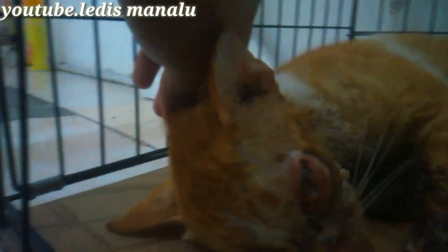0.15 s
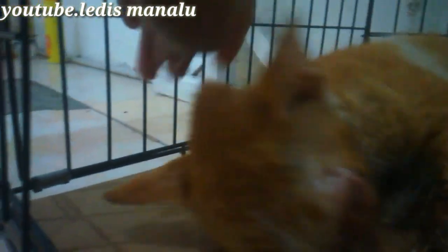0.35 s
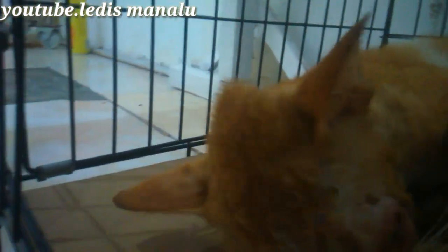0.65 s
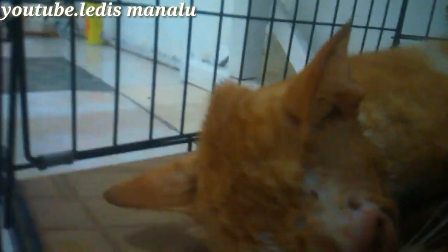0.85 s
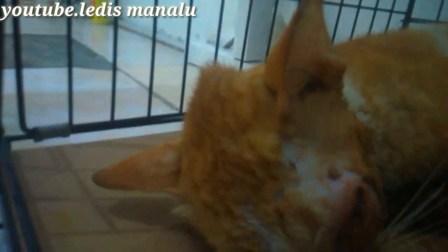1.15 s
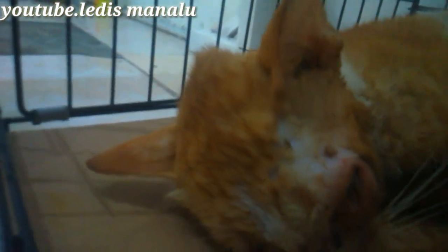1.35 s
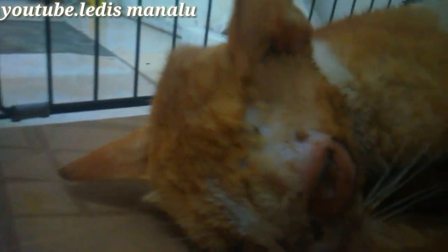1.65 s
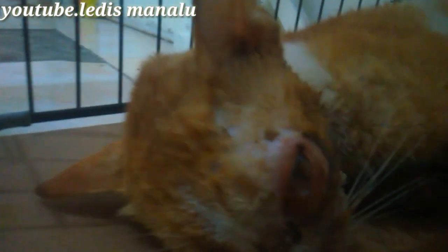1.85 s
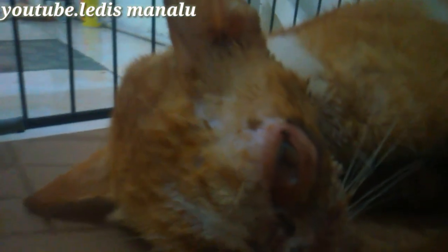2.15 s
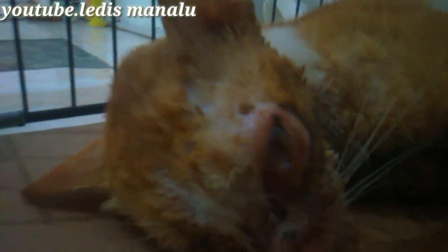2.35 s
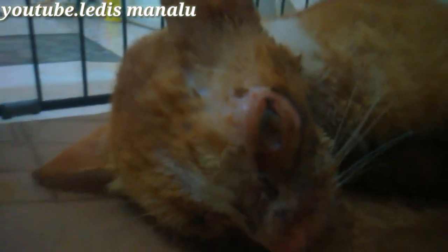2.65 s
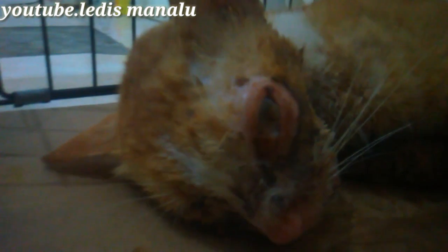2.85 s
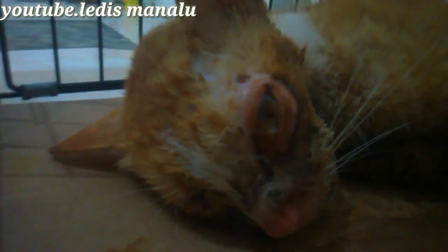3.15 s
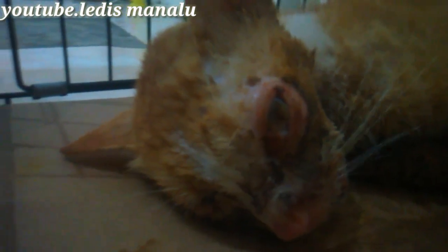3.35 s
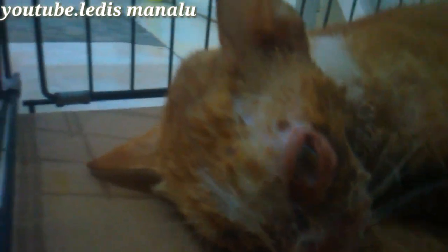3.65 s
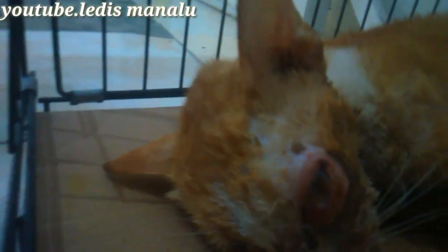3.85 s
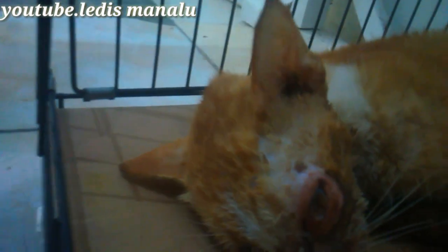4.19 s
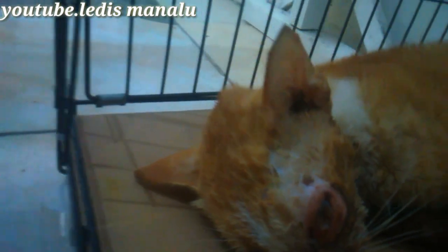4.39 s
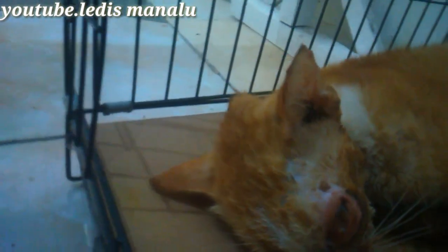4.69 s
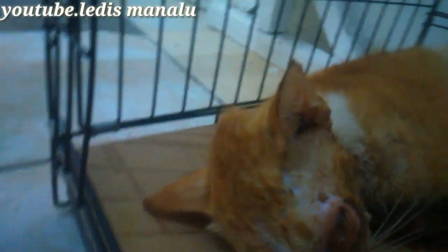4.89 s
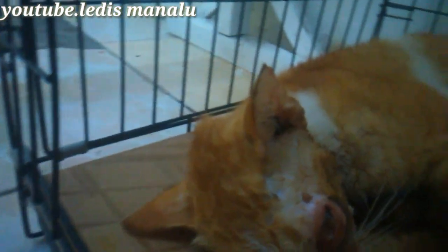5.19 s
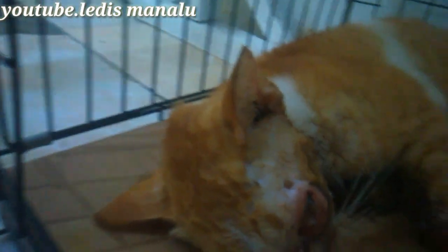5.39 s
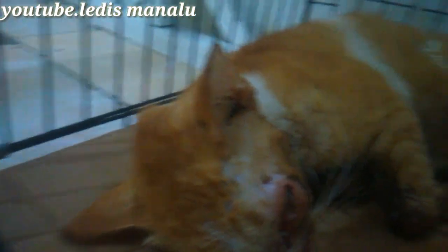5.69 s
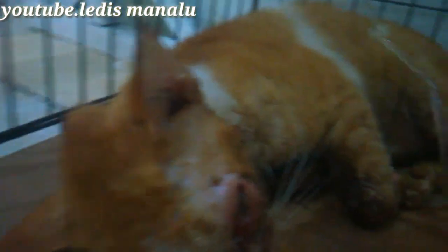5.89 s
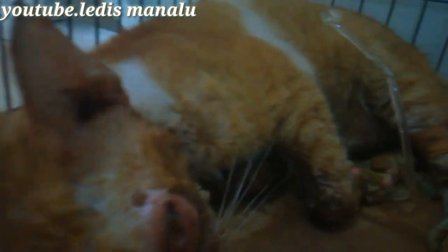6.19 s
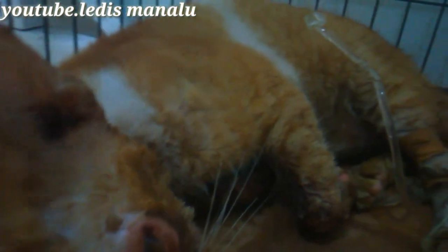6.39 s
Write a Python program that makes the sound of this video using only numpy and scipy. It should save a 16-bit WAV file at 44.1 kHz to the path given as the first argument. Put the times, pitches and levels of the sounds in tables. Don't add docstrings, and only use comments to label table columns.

```python
import sys
import numpy as np
from scipy import signal
from scipy.fft import rfft, irfft, next_fast_len
from scipy.io import wavfile
from scipy.ndimage import uniform_filter1d, map_coordinates

SR = 44100
rng = np.random.default_rng(int(sys.argv[2]) if len(sys.argv) > 2 else 0)


def elevation(decibels):
    levels = np.asarray(decibels, float)
    return 10 ** (levels / 20)


def to_wav(sig):
    pcm = np.clip(np.atleast_2d(sig), -1, 1) * 32767
    pcm = np.round(pcm).astype(np.int16)
    wavfile.write(sys.argv[1], SR, pcm.T)


N = 287973

# start_s, pulse_rate_hz
PULSE_RATE = [(0.0, 22.46), (0.2, 22.16), (0.65, 22.9), (1.17, 22.89), (1.55, 24.35), (1.85, 25.44),
              (2.25, 26.0), (2.5, 26.84), (2.95, 27.51), (3.43, 28.45), (3.82, 29.0), (4.04, 27.84),
              (4.08, 24.65), (4.43, 24.61), (4.65, 23.15), (5.1, 24.05), (6.12, 25.91), (6.53, 26.32)]
# start_s, street_flow_db, hiss_db
STREET_FLOW = [(0.0, -43, -57.5), (0.2, -44.5, -53), (0.65, -41.5, -53.5), (1.73, -37.5, -55),
               (2.07, -38.5, -58), (2.35, -35.5, -55), (2.71, -36.5, -52), (2.9, -33.5, -49),
               (3.58, -35, -52.5), (3.76, -34.5, -52.5), (3.95, -38.5, -56), (4.29, -42, -71),
               (4.53, -43, -70), (4.67, -50.5, -66), (5.22, -50, -65), (5.87, -46.5, -54.5),
               (6.24, -44.5, -50), (6.53, -47.5, -55.5)]
MEAN_FLOW_DB, MEAN_HISS_DB = -41, -57


def unit(x):
    return x / np.sqrt(np.mean(x ** 2) + 1e-20)


def along(points, hz):
    f, v = np.transpose(points)
    return np.interp(np.log(hz + 1), np.log(f + 1), v)


def curves(rows):
    s, *cols = np.transpose(rows)
    return [np.interp(np.arange(N) / SR, s, c) for c in cols]


def wobble(rate_hz):
    t = np.arange(0, N + 128, step=128)
    knots = rng.standard_normal(400)
    return np.interp(np.arange(N), t, map_coordinates(knots, [t * rate_hz / SR], mode="wrap"))


def swell(start_s, length_s):
    out = np.zeros(N)
    live = np.arange(round(start_s * SR), min(N, round((start_s + length_s) * SR)))
    out[live] = np.abs(np.sin(np.pi * (live / SR - start_s) / length_s))
    return out


def filtered(x, response):
    m = next_fast_len(N + SR // 2)
    x = np.pad(x, ((0, 0), (4096, 4096)), mode="reflect")
    return irfft(rfft(x, m) * response(np.fft.rfftfreq(m, 1 / SR)), m)[:, 4096:][:, :N]


def rush(spectrum, patchy_db, lead_s=0):
    # pitch_hz, left_right_likeness (0-1)
    alike = [(60, .997), (130, .98), (290, .7), (640, .4), (1400, .22), (3100, .15), (6800, 0)]
    z = signal.stft(rng.standard_normal((2, N + 512)), nperseg=512)[2]
    field = uniform_filter1d(rng.standard_normal(z.shape[1:]), size=6, axis=0)
    field = uniform_filter1d(field, size=12, axis=1)
    pair = signal.istft(z * elevation(patchy_db * unit(field)), nperseg=512)[1][:, :N]

    def mid_side(hz):
        turn = np.arccos(np.clip(along(alike, hz), -1, .999)) / 2
        return elevation(along(spectrum, hz)) * [np.cos(turn), np.sin(turn)]

    mid, side = filtered(pair, mid_side)
    early = np.pad(mid + side, (0, 64), mode="reflect")[round(lead_s * SR):][:N]
    return np.array([early, mid - side]) / np.std(mid)


def tone(phase, db, wander, spread):
    drift = wander * wobble(6) + spread * np.array([[1], [-1]]) * (1 + 0.17 * wobble(3.09))
    return np.sqrt(2) * elevation(db) * np.sin(phase + drift + rng.uniform(0, 2 * np.pi))


def throbs(*overtones_hz):
    # start_s, length_s, peak_db, resonance_hz
    throb_events = [(0.209, 0.31, -30, 111.5), (0.585, 0.34, -22.5, 116), (0.962, 0.18, -24.5, 112),
                    (1.203, .2, -23, 123), (1.411, 0.13, -27.5, 118), (1.635, 0.08, -27, 102),
                    (1.7, 0.33, -19, 132.3), (1.708, 0.37, -28, 150), (2.087, 0.26, -21.5, 120),
                    (2.15, 1, -27.5, 155), (2.494, 0.13, -19.5, 114), (2.59, 0.52, -19, 141),
                    (3.04, 0.18, -19.5, 127), (3.233, 0.46, -16, 112.5), (3.305, 0.23, -25, 172.6),
                    (3.574, .25, -27, 166), (3.779, 0.29, -23, 109), (4.178, 0.17, -23.5, 108),
                    (4.37, 0.12, -22.5, 107), (4.506, 0.12, -22, 116.6), (4.623, 0.098, -30, 107.6),
                    (4.8, 0.059, -27, 106.6), (5.09, 0.13, -30.5, 97), (5.258, 0.84, -30, 128),
                    (5.373, .12, -28.5, 98), (5.551, 0.081, -29, 100), (5.757, 0.31, -33, 155),
                    (5.915, 0.14, -27, 104), (6.195, 0.77, -28, 105.2), (6.343, .3, -30, 133.9)]
    half_width_hz, flat = 13.2, 0.31
    at = np.arange(0, N + 128, step=128)
    s, length, db, centre_hz = np.transpose(throb_events)[:, :, None]
    arch = np.abs(np.sin(np.pi * np.clip((at / SR - s) / length, 0, 1)))
    power = (elevation(db) * arch ** flat) ** 2
    shares = []
    for hz in overtones_hz:
        off = (hz[np.minimum(at, N - 1)] - centre_hz) / half_width_hz
        shares.append(1 / (1 + off ** 2) ** 2)
    return [np.interp(np.arange(N), at, np.sqrt(np.sum(power * share, axis=0))) for share in (*shares, 1)]


def engine():
    # start_s, length_s, peak_db
    low_swells = [(.17, 0.26, -48), (0.457, 0.23, -37), (.98, 0.57, -46), (1.45, 0.84, -32),
                  (2.506, 0.19, -41), (2.9, 0.22, -37), (3.3, 0.8, -50), (4.15, 0.45, -30.5),
                  (5.029, .8, -29.5), (5.51, 0.83, -26), (6.22, 0.39, -37)]
    # multiple, level_db (below the mean of the strong ones)
    weak = [(3, -18), (7, -23), (8, -25)]
    between_db, flutter_db = -44, 2
    hz, = curves(PULSE_RATE)
    phase = 2 * np.pi * np.cumsum(hz) / SR
    low = np.sqrt(sum((elevation(db) * swell(s, length) ** 0.37) ** 2 for s, length, db in low_swells))
    out = (low + elevation(-49)) * tone(2 * phase, 1.3 * wobble(9.2), wander=0.11, spread=0.05)
    *sizes, whole = throbs(*(k * hz for k in range(4, 7)))
    for k, size in zip(range(4, 7), sizes):
        size = size * elevation(flutter_db * wobble(14)) + elevation(between_db + 3.7 * wobble(13))
        out += size * tone(k * phase, 0, wander=0.065, spread=0.051)
    slow_db = uniform_filter1d(10 * np.log10(whole ** 2 + elevation(between_db) ** 2), size=SR // 3) - 3
    for k, db in weak:
        out += tone(round(k) * phase, slow_db + db + 5 * wobble(8), wander=1.83, spread=0.2)
    return out


def room():
    # pitch_hz, density_db (per Hz)
    boom_modes = [(18, -43), (30, -26), (108, -4), (137, -3.5), (200, -17.5), (260, -36), (440, -120)]
    drone_modes = [(110, -15), (185, -1.5), (221, -3.5), (280, -1), (340, -16), (440, -36), (750, -120)]
    # start_s, level_db
    idling = [
        (0, -44),
        (1.3, -34.5),
        (2.3, -31.5),
        (3.0, -39),
        (3.25, -32.5),
        (4.12, -37.5),
        (5.15, -46),
        (5.42, -41),
        (6.53, -44),
    ]
    flow_db = curves(STREET_FLOW)[0] - MEAN_FLOW_DB
    boom = elevation(-11.5) * throbs()[0] + elevation(-35 + 0.52 * flow_db + 2.5 * wobble(9))
    drone = elevation(1.5 + curves(idling)[0] + 0.8 * wobble(6.6))
    return boom * rush(boom_modes, patchy_db=2.1) + drone * rush(drone_modes, patchy_db=-1.0)


def air():
    # pitch_hz, density_db (per Hz)
    street_spectrum = [(190, -14), (330, -2.5), (355, -4.5), (526, -3.5), (595, -4.5), (800, -7.5),
                       (1040, -27.5), (1760, -120)]
    tyre_spectrum = [(460, -61), (780, 2.5), (808, -4), (858, 0.5), (922, 1.5), (1240, -8), (1500, -16.5),
                     (2100, -120)]
    traffic_spectrum = [(820, -25), (1400, 0), (1920, -3), (2600, -8), (3670, -14.5), (5000, -18),
                        (6500, -28.5), (11000, -120)]
    hiss_spectrum = [(2400, -10.5), (4000, -8), (6400, -4.5), (10500, -1), (11600, -5), (12100, -15),
                     (12500, -30), (15500, -21)]
    flow_db, hiss_db = curves(STREET_FLOW)
    more_flow_db, more_hiss_db = flow_db - MEAN_FLOW_DB, hiss_db - MEAN_HISS_DB
    tyres_db = -46 + 0.56 * more_flow_db
    traffic_db = -51.5 + 0.37 * more_flow_db + 0.28 * more_hiss_db
    street = elevation(flow_db + 0.5 + 2.34 * wobble(8)) * rush(street_spectrum, patchy_db=1.38)
    tyres = elevation(tyres_db + 1.4 * wobble(7.7)) * rush(tyre_spectrum, patchy_db=1.5, lead_s=0.00021)
    traffic = elevation(traffic_db + 0.86 * wobble(9)) * rush(traffic_spectrum, patchy_db=1.22, lead_s=0.00034)
    hiss = elevation(hiss_db + 0.14 + 0.9 * wobble(13)) * rush(hiss_spectrum, patchy_db=0.43)
    return street + tyres + traffic + hiss


def mains():
    # pitch_hz, level_db (rms)
    hum = [
        (200, -50),
        (300, -45),
        (400, -52.5),
    ]
    t = np.arange(N) / SR
    return sum(tone(2 * np.pi * hz * t, db - 6.0 + 3 * wobble(5), wander=2.46, spread=0.12) for hz, db in hum)


def cage():
    # start_s, peak_db, left_minus_right_db, ring_hz
    ticks = [
        (1.507, -26, 14, 4160),
        (1.6213, -30, 8, 4336),
        (1.696, -35, 4, 7460),
        (1.7814, -31, 4, 13500),
        (2.3017, -32, 4, 9430),
        (3.9444, -53, -3, 4180),
    ]
    # start_s, length_s, level_db
    brushes = [
        (.1, .08, -62),
        (0.422, 0.22, -56),
        (0.683, 0.041, -52),
        (.755, 0.035, -51),
        (1.2, 0.055, -53.5),
        (6.123, 0.051, -56),
    ]
    out, t = np.zeros((2, N + SR)), np.arange(SR // 20) / SR
    late = np.maximum(t - .002, 0)
    for s, db, pan_db, hz in ticks:
        crack = .5 * elevation(-60 * t / .009) * rng.standard_normal((2, len(t)))
        ring = .3 * elevation(-60 * late / .012) * np.sin(2 * np.pi * hz * late)
        out[:, round(s * SR):][:, :len(t)] += (crack + ring) * elevation(db + pan_db * np.array([[.5], [-.5]]))
    stroke = sum(elevation(db) * swell(s, length) for s, length, db in brushes)
    fur = stroke * rush([(5000, -39), (8000, -1), (11000, 0), (15000, -8)], patchy_db=3.5)
    wire_colour = lambda hz: hz ** 2 / (hz ** 2 + 1100 ** 2) / (1 + (hz / 11800) ** 6)
    return filtered(out[:, :N], wire_colour) + fur


def whine():
    # start_s, level_db
    whine_level = [
        (1.9, -53),
        (2.12, -29.5),
        (2.36, -37),
        (2.65, -38.5),
        (2.75, -31.5),
        (3.1, -33.5),
        (3.31, -25),
        (3.54, -29.5),
        (3.75, -30),
    ]
    db, = curves(whine_level)
    hz = np.minimum(28.1 * uniform_filter1d(curves(PULSE_RATE)[0], size=SR // 2), 794)
    start_s, end_s = whine_level[0][0], whine_level[-1][0]
    phase = 2 * np.pi * np.cumsum(hz) / SR
    pair = 0
    for ratio in (.986, 1.014):
        smeared = phase * ratio + 1.18 * wobble(45)
        pair = pair + tone(smeared, db - 6.5 + 4 * wobble(17), wander=0.64, spread=0.32)
    return np.sqrt(swell(start_s, end_s - start_s)) * pair


def squeals():
    # start_s, length_s, pitch_hz, width_hz, level_db
    squeal_events = [
        (2.74, 1.3, 2920, 120.1, -52.5),
        (5.045, 0.98, 3044, 120.3, -62),
        (5.4, 0.47, 3510, 90, -61),
        (4.36, 0.26, 914, 55, -45.5),
        (5.4, 1.24, 935, 50, -47),
        (5.9, 0.85, 2979, 119.9, -58),
    ]
    m = next_fast_len(N)
    noise, f = rfft(rng.standard_normal((2, m))), np.fft.rfftfreq(m, 1 / SR)
    out = np.zeros((2, N))
    for s, length, hz, wide, db in squeal_events:
        band = irfft(noise * np.exp(-.5 * ((f - hz) / wide) ** 2), m)[:, :N]
        out += elevation(db) * np.sqrt(swell(s, length)) * unit(band)
    return out


def scene():
    return engine() + room() + air() + mains() + cage() + whine() + squeals()


def thinned(x):
    # pitch_hz, least_size (re neighbours), share of empty patches (0-1)
    gaps = np.array([(2600, 0, 0), (3400, .72, 0), (4800, .95, 0), (6500, .8, 0), (12250, .5, 0),
                     (12500, .6, .68), (14000, .6, .74), (15500, .6, .88)])
    padded = np.pad(x, ((0, 0), (0, 4096)), mode="reflect")
    hz, _, z = signal.stft(padded, SR, nperseg=2048, boundary="even")
    least, share = (along(gaps[:, [0, k]], hz)[:, None] for k in (1, 2))
    size = uniform_filter1d(uniform_filter1d(np.abs(z).mean(axis=0), size=4, axis=0), size=2, axis=1)
    around = uniform_filter1d(uniform_filter1d(size, size=60, axis=0), size=5, axis=1)
    luck = rng.random((len(hz) // 20 + 1, z.shape[2] // 2 + 1)).repeat(20, axis=0).repeat(2, axis=1)
    top = size[hz > 12500].mean(axis=0)
    patch = luck[:len(hz), :z.shape[2]] > share * np.clip(1.6 * np.median(top) / top, 0, 1)
    kept = (size > least * around) & patch
    return signal.istft(z * np.maximum(kept, .02), SR, nperseg=2048)[1][:, :N]


def band_limit(x):
    return signal.sosfilt(signal.butter(12, 15710, fs=SR, output="sos"), x)


def record(dry):
    # pitch_hz, density_db (per Hz)
    self_noise = [(8000, -43), (12000, -14), (13500, 2), (15500, -3), (17000, -63)]
    # pitch_hz, left_minus_right_db
    lean = [(60, -0.5), (110, -2), (330, 2), (700, -1), (1290, 1.5), (2380, 0.2), (8120, 0.5), (15000, 6.5)]
    noisy = dry + elevation(-75.0) * rush(self_noise, patchy_db=5.5)
    ports = filtered(noisy, lambda hz: elevation(along(lean, hz) * np.array([[.5], [-.5]])))
    closing = np.sin(np.pi / 2 * np.clip(np.arange(N)[::-1] / 250, 0, 1)) ** 2
    return band_limit(thinned(ports) * closing)


dry = scene()
out = record(dry)
to_wav(out)
```